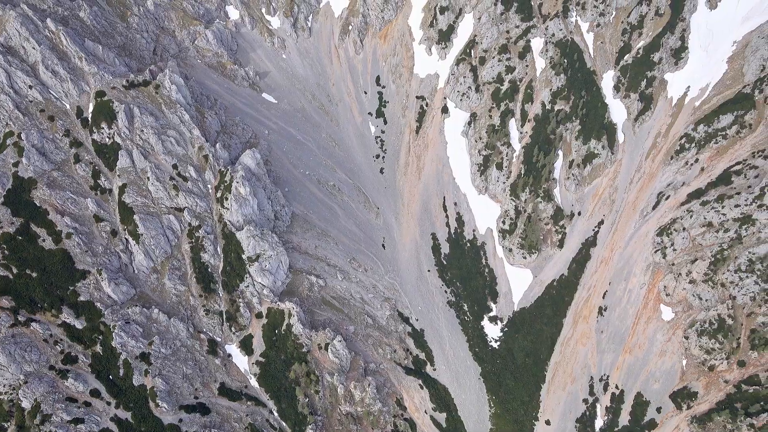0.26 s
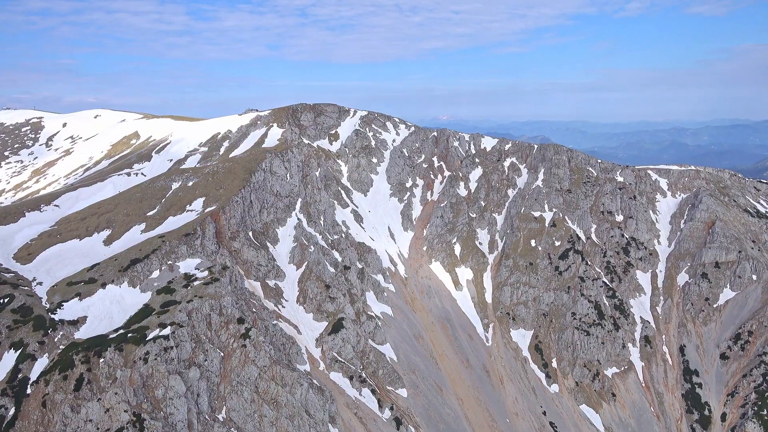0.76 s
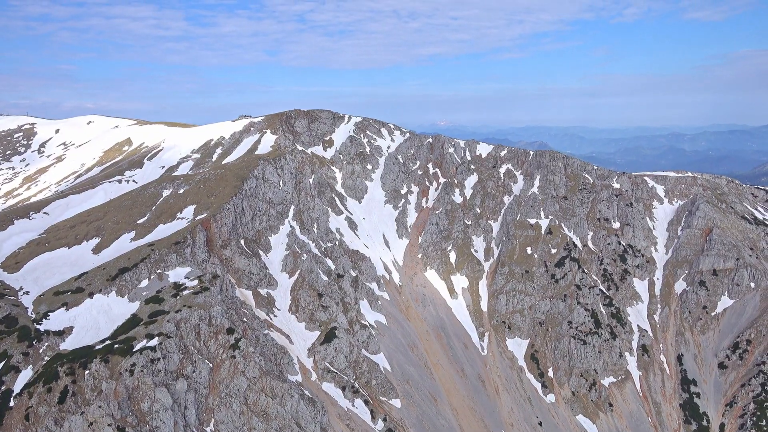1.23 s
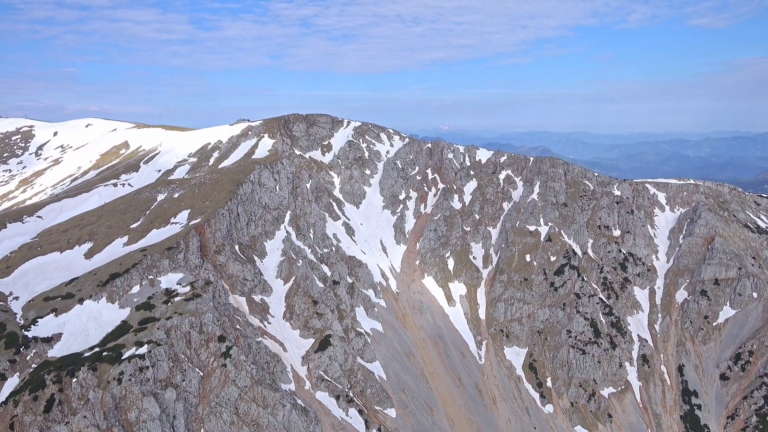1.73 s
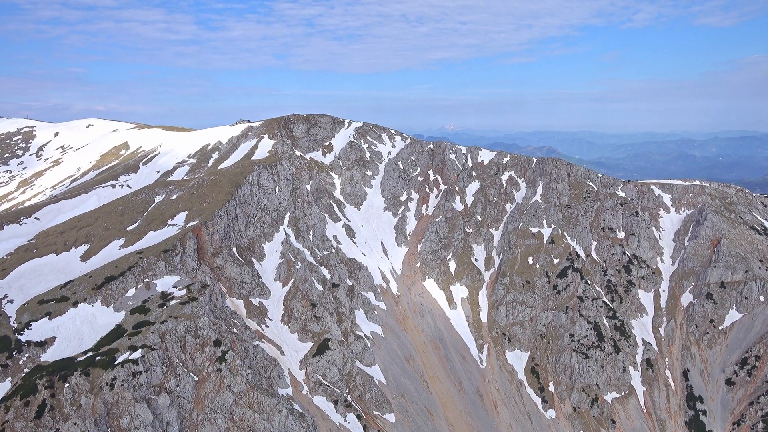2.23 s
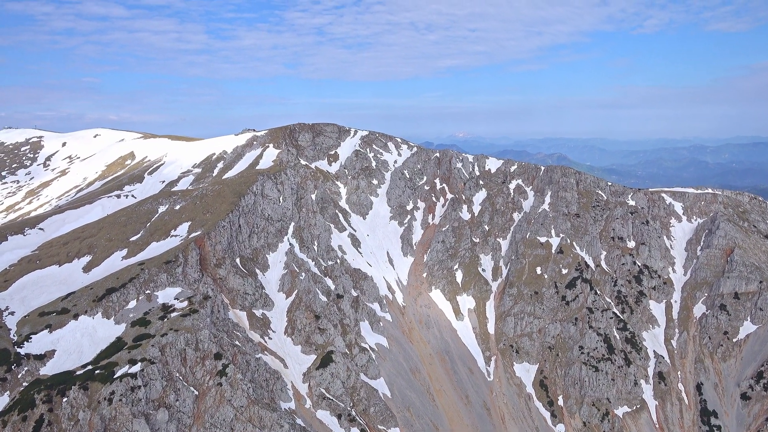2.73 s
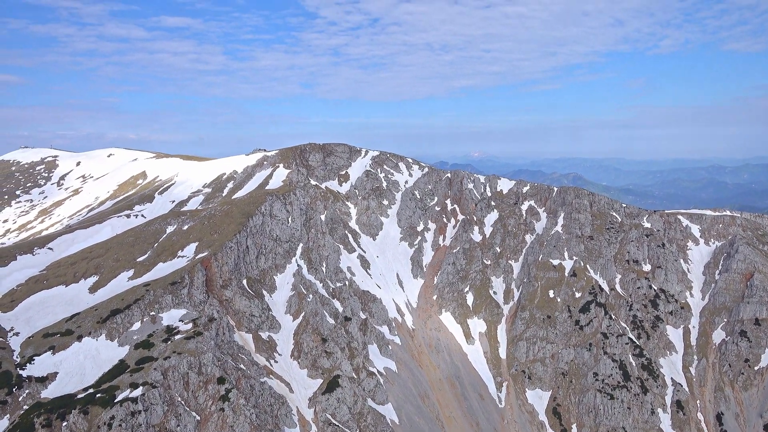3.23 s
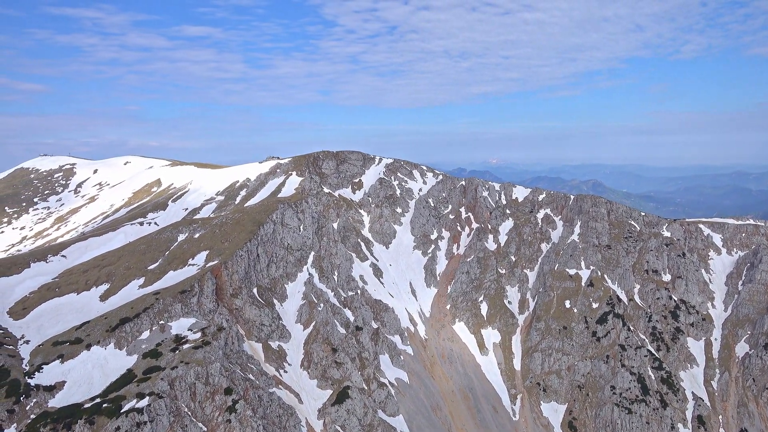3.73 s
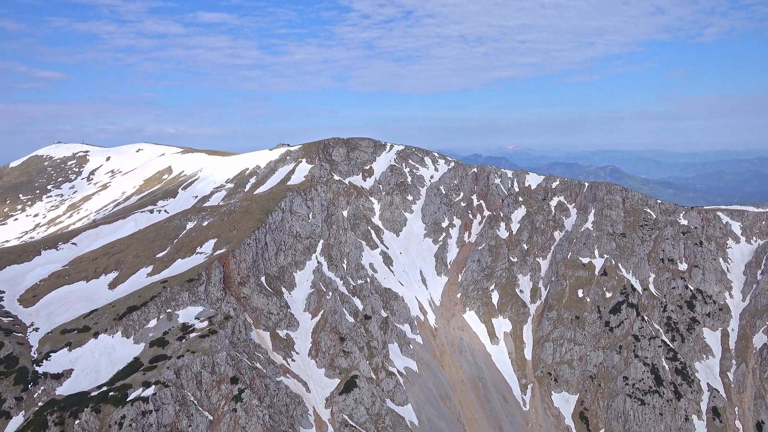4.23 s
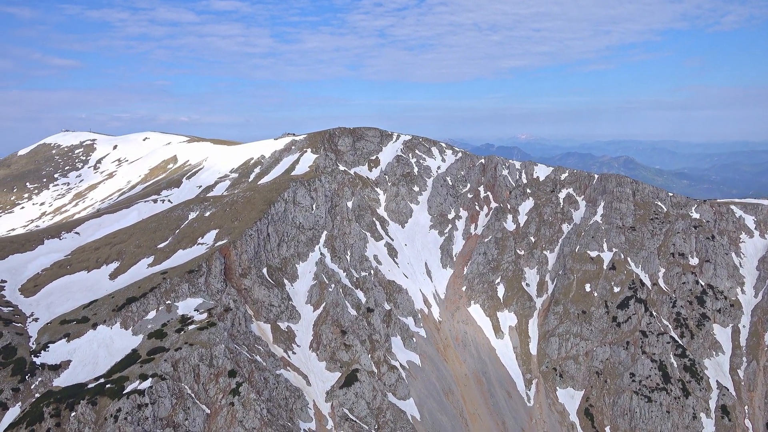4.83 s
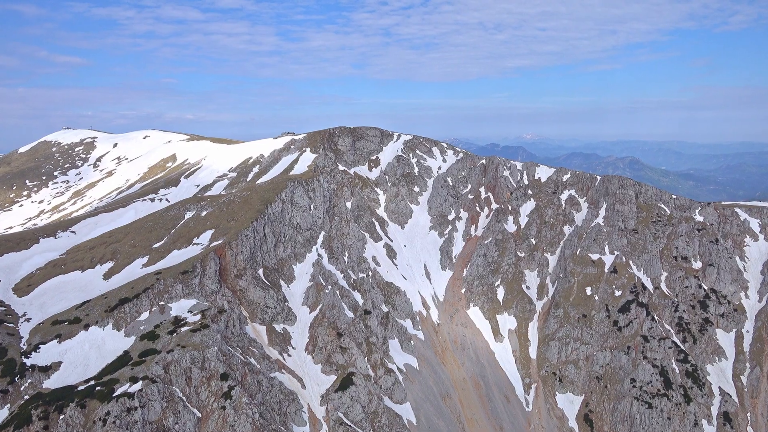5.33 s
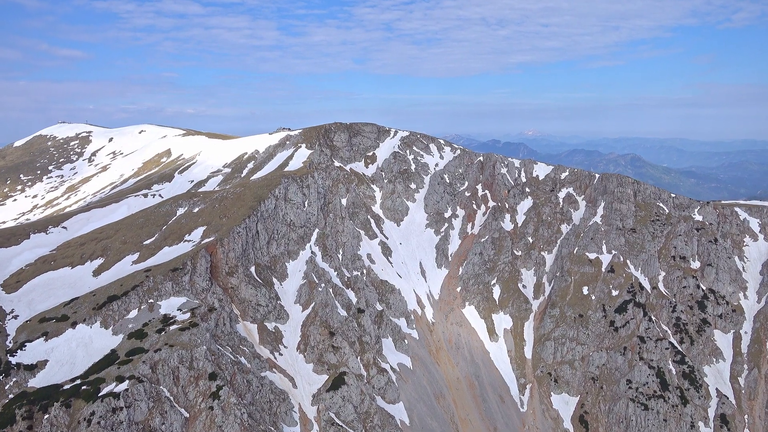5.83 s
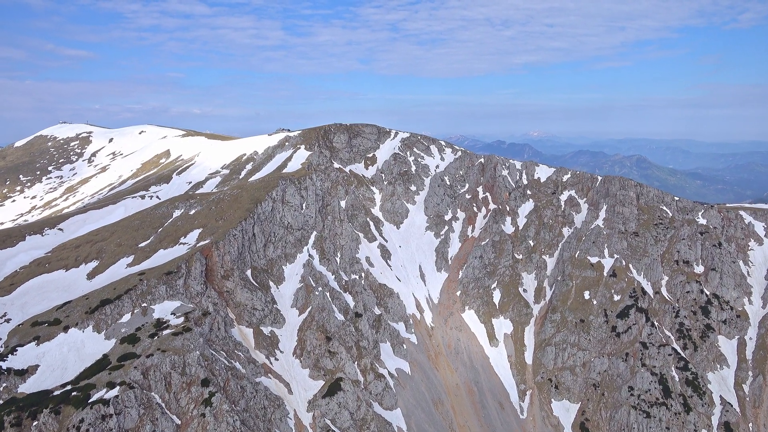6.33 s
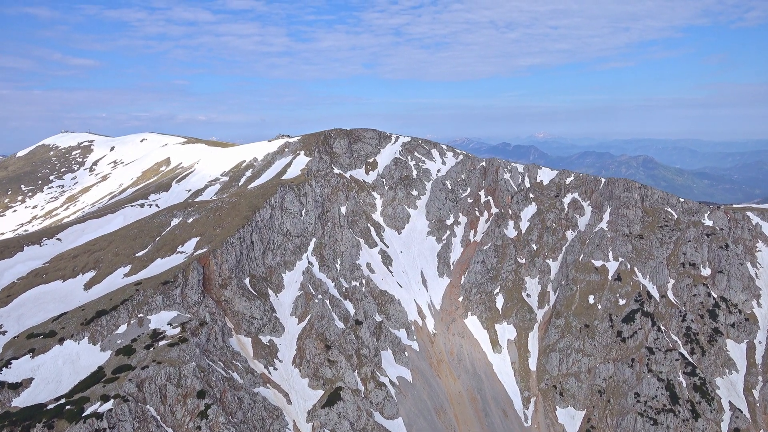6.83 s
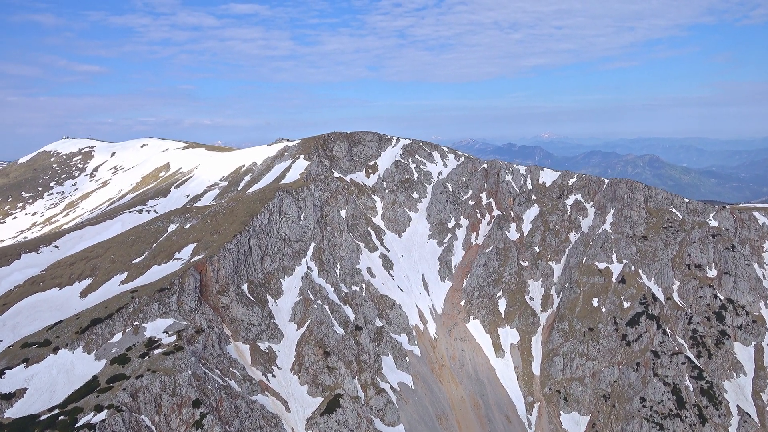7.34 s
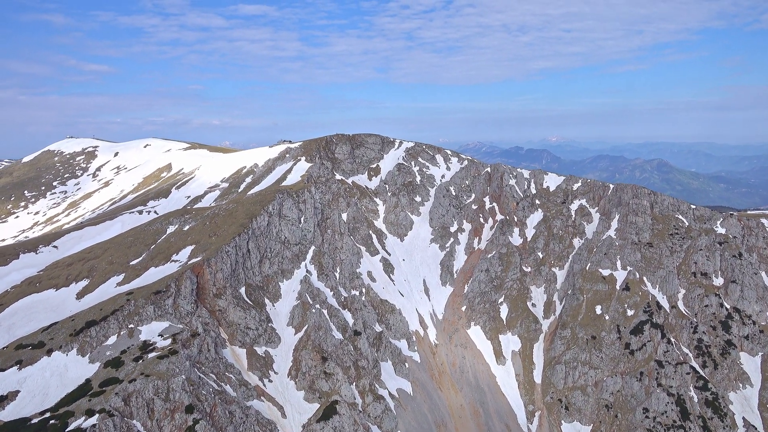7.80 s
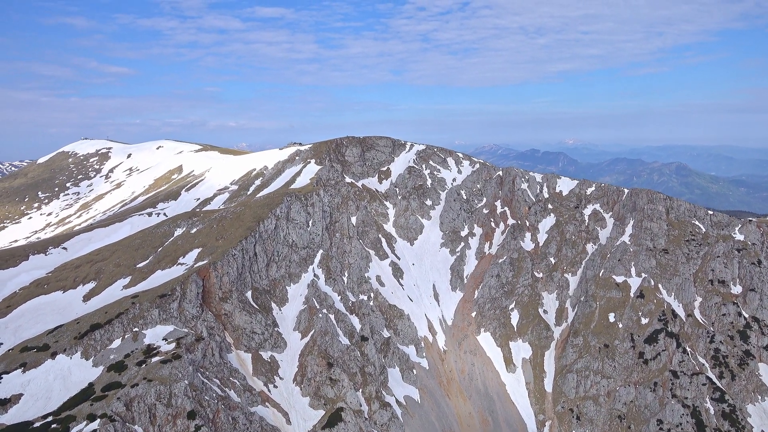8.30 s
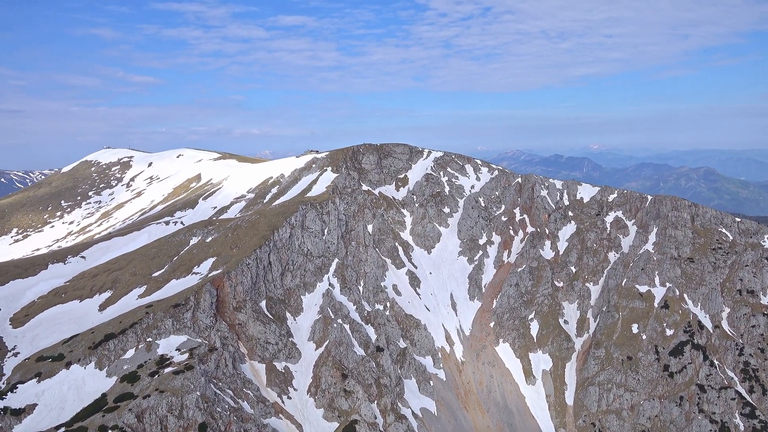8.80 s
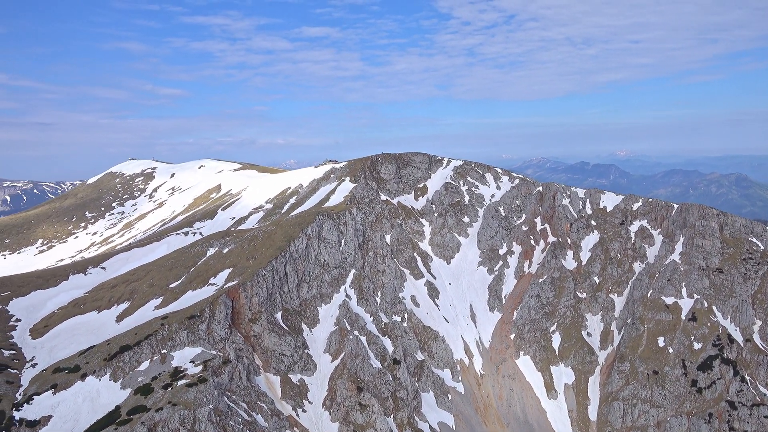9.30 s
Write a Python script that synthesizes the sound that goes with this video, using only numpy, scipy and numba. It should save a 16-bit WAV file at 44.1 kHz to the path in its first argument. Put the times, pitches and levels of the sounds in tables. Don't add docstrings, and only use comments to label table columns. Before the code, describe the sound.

A small open rotorcraft cruises steadily, its rear propeller droning low and buzzy over rushing wind, with faint rotor blades swishing rhythmically overhead.

```python
import sys
import numpy as np
from scipy import signal
from scipy.io import wavfile
from scipy.ndimage import uniform_filter1d
from numba import njit

SR = 44100
rng = np.random.default_rng(int(sys.argv[2]) if len(sys.argv) > 2 else 0)


def int16_out(signal):
    q = np.round(np.clip(np.atleast_2d(signal).T, -1, 1) * 32767)
    wavfile.write(sys.argv[1], SR, q.astype(np.int16))


def voltage_ratio(decibels):
    exponent = np.asarray(decibels, float) / 20
    return 10 ** exponent


N = 421574
T = np.arange(N) / SR


@njit
def svf(x, hz, width):
    y = np.empty(len(x))
    band, low = 0., 0.
    for i in range(len(x)):
        g = np.tan(np.pi * hz[i] / SR)
        damping = width / hz[i]
        v = (band + g * (x[i] - low)) / (1 + g * (g + damping))
        band = 2 * v - band
        low = low + 2 * g * v
        y[i] = damping * v
    return y


@njit
def follow(x, attack, release):
    y = np.empty(len(x))
    envelope = .3
    for i in range(len(x)):
        size = abs(x[i])
        envelope += (size - envelope) * (attack if size > envelope else release)
        y[i] = envelope
    return y


def columns(table):
    s, *rest = np.transpose(table)
    return [np.interp(T, s, c) for c in rest]


def humps(table):
    return sum(db * np.exp(-.5 * ((T - s) / half) ** 2) for s, db, half in table)


def walk(rate):
    hold = int(SR / rate)
    steps = np.repeat(rng.standard_normal(N // hold + 1), hold)
    return 1.27 * uniform_filter1d(uniform_filter1d(steps, hold), hold)[:N]


def hiss(hz, width):
    hz = np.clip(hz + 0 * T, 5, .45 * SR)
    once = svf(rng.standard_normal(N), hz, 1. * width)
    twice = svf(once, hz, 1. * width)
    return twice / twice.std()


def tone(turns, db):
    level = np.sqrt(2) * voltage_ratio(db + walk(9))
    return level * np.cos(2 * np.pi * (turns + rng.random()) + 0.18 * walk(12))


# (time [s], blade rate [Hz], drone level [dB], blade load [dB], sideslip [dB])
PROPELLER_FLIGHT = [(0.1, 95.7, -0.5, 5.5, -1), (0.45, 95.95, 1, -1.5, -1.5), (0.8, 94.75, 2, -6.5, 6),
                    (1.3, 94.9, -0.5, -7, 4), (1.85, 94.8, -2, -4, 3.5), (2.5, 95.35, 0.8, -3, -0.5),
                    (2.9, 95.5, -1.5, 1.5, -6.5), (3.3, 95.95, -1.2, 7.5, 3), (4.1, 95.37, 0.2, 4, -4.5),
                    (5.0, 95.56, 1.6, -4, 2), (5.55, 96.5, -0.5, -8, -3), (6.12, 97.43, 0.3, -11, -2),
                    (6.58, 97.9, -0.5, 10.5, 3.5), (7.4, 98.3, 2, 8, 2.5), (8.15, 97.33, 0.8, 1, -8.5),
                    (8.6, 96.5, 2.5, 0, -7), (8.95, 96.7, 3.5, -2, -2.5), (9.46, 96.5, 0.5, 4, -2.5)]


def propeller_motion():
    blade_hz, level_db, load, slip = columns(PROPELLER_FLIGHT)
    return np.cumsum(blade_hz) / SR, level_db, load, slip


# (time [s], rush level [dB])
GUSTS = [(0, -35.5), (.9, -36.5), (1.3, -37), (1.9, -39.5), (2.5, -37), (3.7, -38), (4.7, -32),
         (5.7, -36.5), (6.4, -33.5), (7.4, -33.5), (8.2, -33), (8.85, -30.5), (9.56, -31)]
# (time [s], level above the rush [dB], half length [s])
PUFFS = [(.14, 2.5, .04), (.34, 6, 0.011), (.69, 6, 0.089), (1.04, 6.5, 0.054), (1.49, 8, 0.014),
         (1.84, -4.5, 0.017), (1.96, 4.5, .03), (2.61, 6.5, .015), (2.82, 4.5, 0.017), (3.25, 3.5, .025),
         (3.8, 6.5, 0.0091), (4.12, -3.5, .02), (4.17, 0, .04), (5.93, 0, 0.011), (6.02, 2, .04),
         (6.29, 1, .05), (6.51, 2.5, .03), (6.61, 0, .04), (6.89, -4, .02), (7.39, 4.5, .05),
         (7.6, -1, .06), (8.39, -6, 0.013), (9.21, 2, 0.049), (9.47, -8.5, 0.017), (9.53, -0.5, 0.013)]
# (frequency [Hz], spectral density [dB per Hz])
WIND_SPECTRUM = [(12, -6.5), (30, 0), (130, -1.5), (240, -6.5), (295, -0.5), (360, -12), (460, -11),
                 (700, -11.5), (1000, -19.5), (1400, -31.5), (2500, -35.5), (4500, -45.5), (6500, -59.5),
                 (13000, -71.5)]


def wind(blades):
    flurry_db, flurries_per_s, wind_db = 1.37, 18, -16.5
    rush_db = columns(GUSTS)[0] + humps(PUFFS) + flurry_db * walk(flurries_per_s)
    gust_db = 0.56 * (rush_db - rush_db.mean()) + 0.24 * walk(25)
    hz_at, density_db = np.transpose(WIND_SPECTRUM)
    out = 0
    for hz in 12 * 2 ** np.arange(0, 10.1, 1 / 3):
        db = np.interp(np.log(hz), np.log(hz_at), density_db) + 10 * np.log10(hz / 100)
        high = np.clip(np.log2(hz / 150) / 2.1, 0, 1)
        db = db + high * gust_db + 0.62 * walk(14)
        wake_depth = 0.26 * np.exp(-np.log2(hz / 800) ** 2)
        wake = 1 + wake_depth * np.cos(2 * np.pi * blades)
        out = out + voltage_ratio(db) * hiss(hz, hz * 0.34) * wake
    return out * voltage_ratio(wind_db) / out.std()


# (time [s], peak level [dB], centre frequency [Hz])
EDDIES = [(0.322, -31, 1480), (1.4766, -29, 1370), (1.6408, -27, 1421), (2.0662, -32, 1339),
          (2.5965, -32, 1340), (2.8165, -25, 1451), (3.3249, -23.5, 1299), (4.0862, -26, 1430),
          (5.316, -24, 1300), (5.917, -24, 1340), (6.2777, -27, 1360), (7.2086, -31, 1370)]


def slaps():
    out = np.zeros(N)
    after = np.arange(900) / SR
    for s, db, hz in EDDIES:
        puff = rng.standard_normal(len(after)) * np.exp(-after / 0.0046)
        centre = hz + 0 * after
        burst = svf(svf(puff, centre, 1.1 * hz), centre, 1.1 * hz)
        start = int(s * SR)
        out[start:start + len(after)] += voltage_ratio(db) * burst / np.abs(burst).max()
    return out


def sweep(ahead, centre, width):
    return np.exp(-.5 * ((ahead - centre) / width) ** 2)


# (time [s], whistle level change [dB], half length [s])
DISC_GUSTS = [
    (1.08, 5, .06),
    (2.5, 2.5, .05),
    (4.05, -3, .06),
    (4.57, -6, .06),
    (6.79, 3, .05),
    (7.48, 4.5, .08),
    (8.0, -4, .06),
    (8.52, 2.5, .04),
    (8.75, 3.5, 0.11),
    (9.38, 4.5, .04),
]


def tip_whistle(ahead, level_chance, pitch_chance, whistle_hz, whistle_db):
    glide = whistle_hz * (1 + 0.16 * (ahead + 0.14) + 0.029 * pitch_chance)
    level = voltage_ratio(whistle_db + humps(DISC_GUSTS) - 0.5 + 0.9 * level_chance)
    return level * (0.12 + sweep(ahead, -0.18, 0.13)) * hiss(glide, 990)


def blade_swish(ahead, chance, swish_db):
    noise = voltage_ratio(0.5) * hiss(7740, 4900) + voltage_ratio(-8.5) * hiss(10200, 4000)
    return voltage_ratio(swish_db - 3.5 + .9 * chance) * (0.74 + sweep(ahead, -.03, 0.14)) * noise


def blade_chirp(ahead, number, chance, swish_db):
    level = voltage_ratio(swish_db + 3.0 - 7 * (number % 2) + 2.7 * chance)
    return level * sweep(ahead, -0.038, 0.04) * hiss(8300, 1100)


# (time [s], strength [dB], half length [s])
VORTICES = [
    (.75, 4.5, .3),
    (4.74, 3, .15),
    (7.38, 10, .22),
    (7.8, 12.5, .14),
    (8.78, 11, .2),
    (9.14, 11, .13),
]


def vortex_sizzle(ahead, chance):
    level = voltage_ratio(-74 + 1.8 * humps(VORTICES) + 1.2 * chance)
    return level * (.25 + sweep(ahead, .04, .14)) * hiss(14200, 10000)


# (time first blade is overhead [s], whistle pitch [Hz], whistle [dB], swish [dB])
ROTOR_TURNS = [(0.048, 4740, -59, -58), (0.756, 4880, -47.5, -55), (1.455, 4520, -50, -58.5),
               (2.152, 4650, -49.5, -58.5), (2.846, 4800, -49.5, -58.5), (3.539, 4610, -45.5, -56.5),
               (4.223, 4870, -50, -55), (4.912, 4720, -48, -53.5), (5.594, 4730, -48, -58),
               (6.279, 4740, -46, -54.5), (6.963, 4530, -48, -54.5), (7.65, 4160, -49.5, -55.5),
               (8.345, 4220, -47.5, -55.5), (9.044, 4500, -43, -52.5), (9.738, 4520, -47, -56)]


def rotor():
    blades_per_turn, turns_per_row = 2, 4
    s = np.array(ROTOR_TURNS)[:, 0]
    ends = np.r_[2 * s[0] - s[1], s, 2 * s[-1] - s[-2]]
    passes = blades_per_turn * turns_per_row * np.interp(T, ends, np.arange(len(ends)))
    number = np.round(passes).astype(int)
    ahead = passes - number
    chance = rng.standard_normal((number.max() + 1, 4))[number].T
    whistle_hz, whistle_db, swish_db = columns(ROTOR_TURNS)

    whistle = tip_whistle(ahead, chance[0], chance[3], whistle_hz, whistle_db)
    rustle = blade_swish(ahead, chance[1], swish_db)
    rustle = rustle + blade_chirp(ahead, number, chance[2], swish_db)
    rustle = rustle + vortex_sizzle(ahead, chance[1])
    flutter = voltage_ratio(1.2 * walk(45))
    throb = tone(passes, -29) + tone(2 * passes, -43.0)
    return whistle + flutter * rustle + throb


# (time [s], level of the firing tone [dB])
THROTTLE = [(.2, -29), (.75, -23.5), (1.2, -35), (2.0, -33.5), (3.0, -25.5), (3.5, -31), (4.6, -24.5),
            (5.3, -31), (5.9, -30.5), (6.3, -28.5), (7.4, -22.5), (7.95, -31.5), (8.5, -22.5), (8.95, -25),
            (9.4, -25)]
# (multiple of the firing rate [1], level against the firing tone [dB])
ENGINE_ORDERS = [
    (.5, -10),
    (1, 1),
    (2, -6),
]


def engine(blades):
    firings_per_blade = 2 * 2.43 / 3
    firing_db = columns(THROTTLE)[0]
    return sum(tone(k * firings_per_blade * blades, firing_db + db) for k, db in ENGINE_ORDERS)


# (multiple of blade rate [1], level [dB], change with load [dB/dB], with sideslip [dB/dB])
HARMONICS = [(1, -19, -0.05, 0.38), (2, -24.5, 0.62, 0.1), (3, -20.5, -0.26, -.2), (4, -36, 0.85, 0.1),
             (5, -36, .75, -0.25), (6, -33, 0.65, -0.16), (7, -43.5, -0.4, 1.3), (8, -31.5, 0.2, -0.27)]
# (multiple of blade rate [1], level [dB])
FAINT_HARMONICS = [(9, -50.5), (10, -43), (11, -46), (12, -55), (13, -64.5), (16, -60.5), (18, -54.5)]


def propeller(blades, level_db, load, slip):
    swell, swells_per_s = 0.0677, 2.164
    top_db = max(row[1] for row in HARMONICS)
    out = 0
    for k, db, per_load, per_slip in HARMONICS:
        flight_db = level_db + per_load * load + per_slip * slip
        swell_db = swell * (top_db - db) * walk(swells_per_s)
        out = out + tone(k * blades, db + flight_db + swell_db)
    for k, db in FAINT_HARMONICS:
        out = out + tone(k * blades, db + 0.6 * walk(2.1))
    return out


def scene():
    blades, level_db, load, slip = propeller_motion()
    air = wind(blades) + slaps()
    drone = engine(blades) + propeller(blades, level_db, load, slip)
    return (air + rotor() + drone)[None]


def top_cut(x):
    return signal.sosfilt(signal.butter(12, 15640, fs=SR, output="sos"), x)


def record(dry):
    level = follow(dry[0], 0.013, 0.00081)
    edge_fade = np.clip(np.minimum(T, T[-1] - T) / 0.0004, 0, 1)
    held = dry * (.36 / level) ** 0.38 * edge_fade
    rounded = np.tanh(1.115 * held) / 1.149
    capsule = signal.butter(4, 12500, fs=SR, output="sos")
    return top_cut(signal.sosfilt(capsule, rounded))


dry = scene()
out = record(dry)
int16_out(out)
```